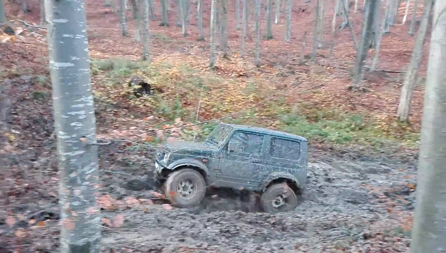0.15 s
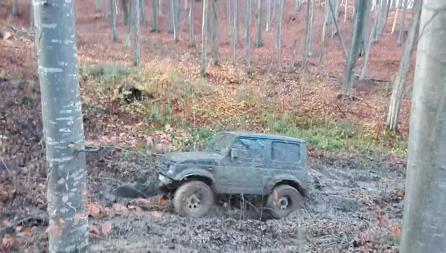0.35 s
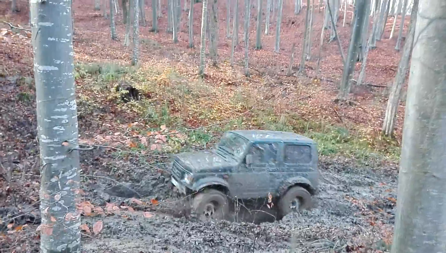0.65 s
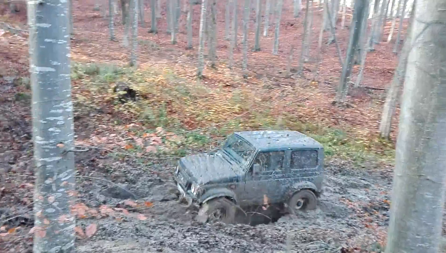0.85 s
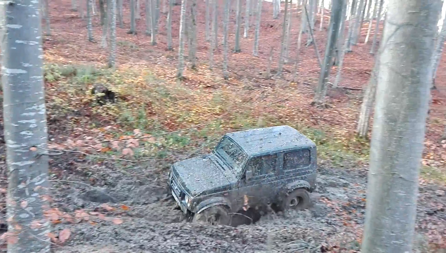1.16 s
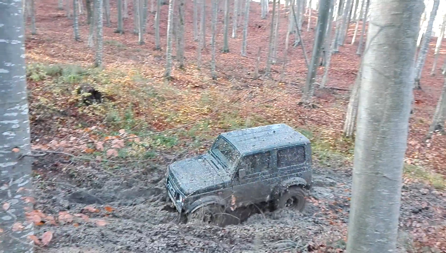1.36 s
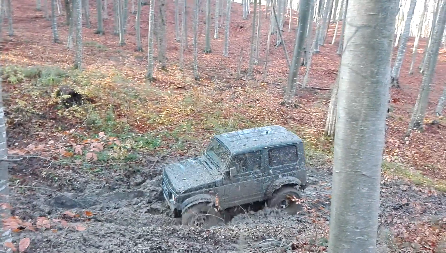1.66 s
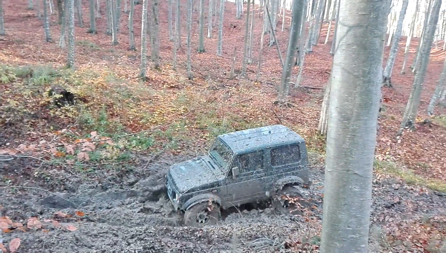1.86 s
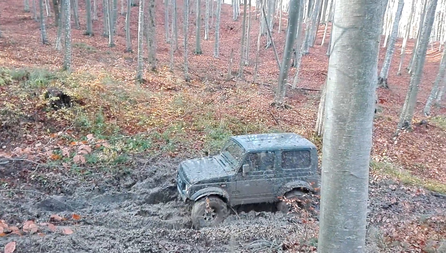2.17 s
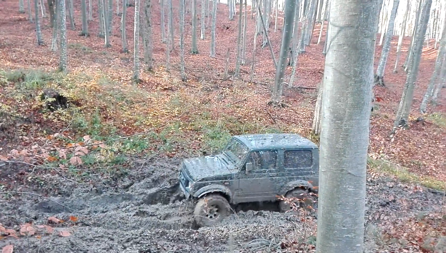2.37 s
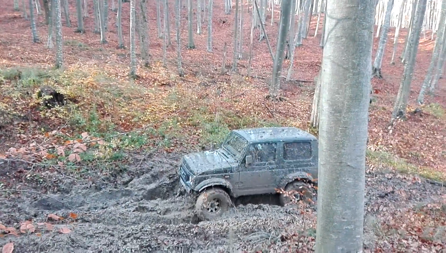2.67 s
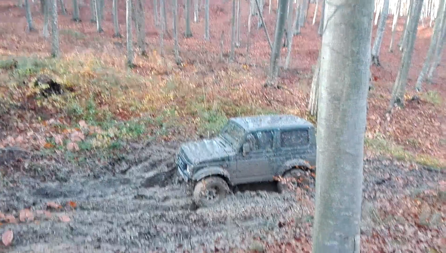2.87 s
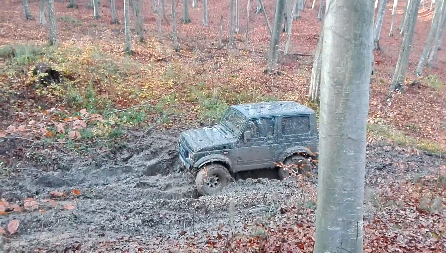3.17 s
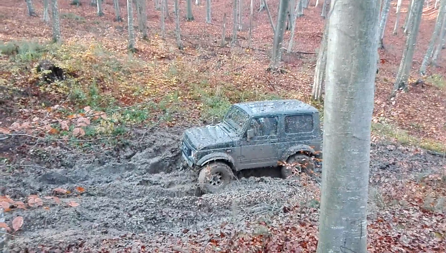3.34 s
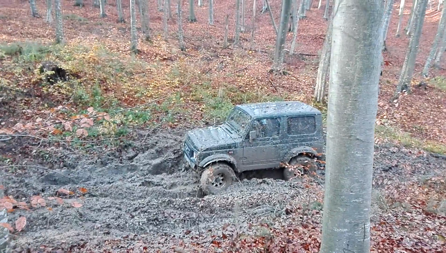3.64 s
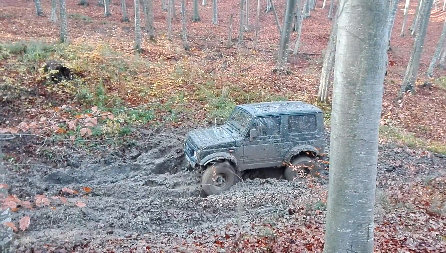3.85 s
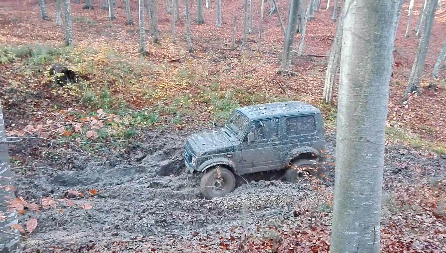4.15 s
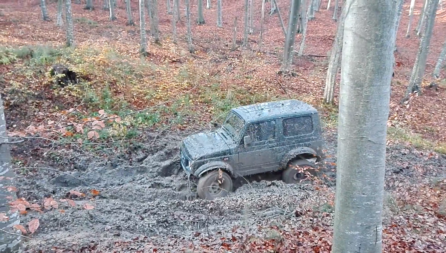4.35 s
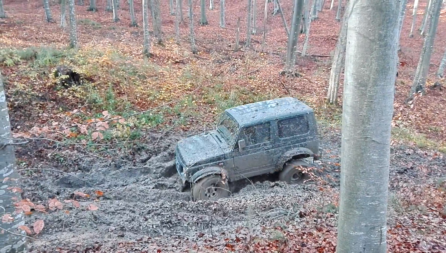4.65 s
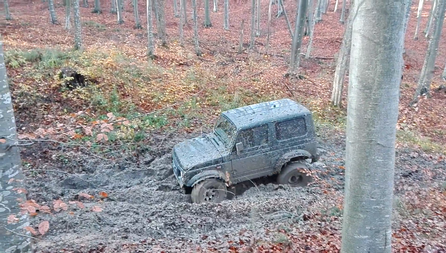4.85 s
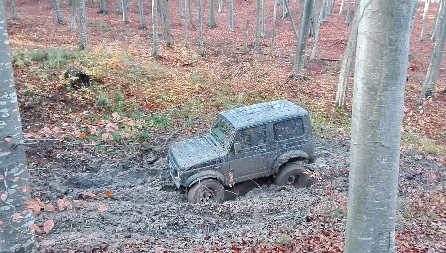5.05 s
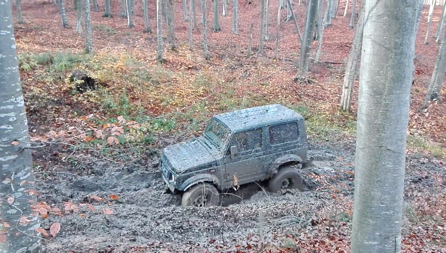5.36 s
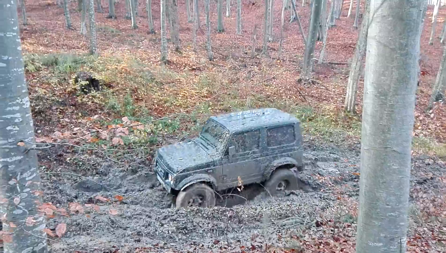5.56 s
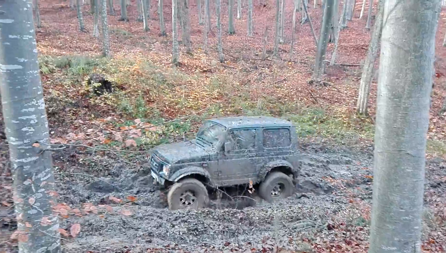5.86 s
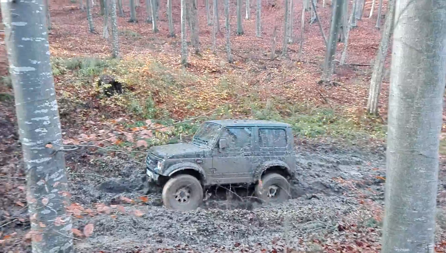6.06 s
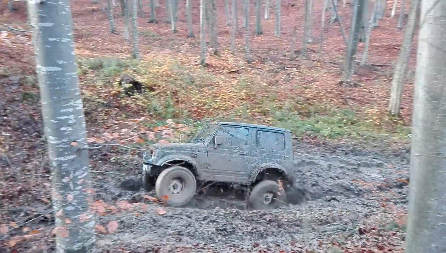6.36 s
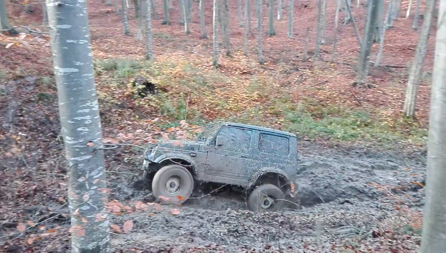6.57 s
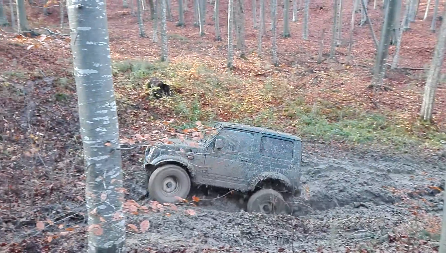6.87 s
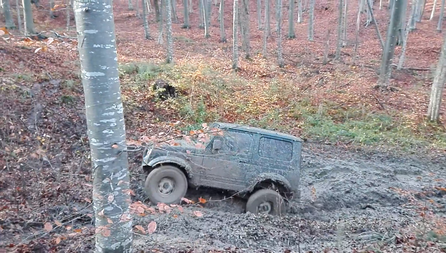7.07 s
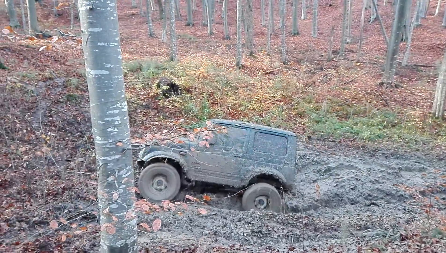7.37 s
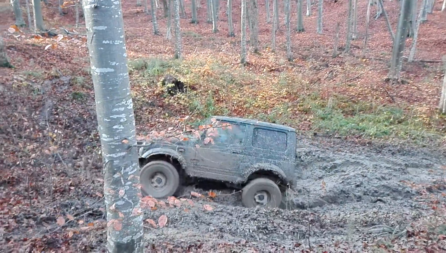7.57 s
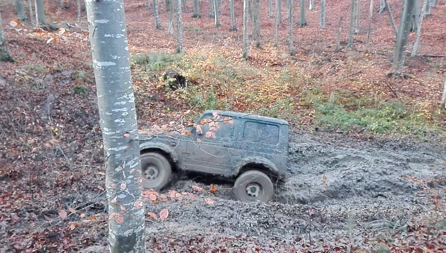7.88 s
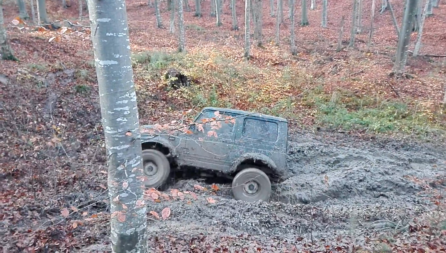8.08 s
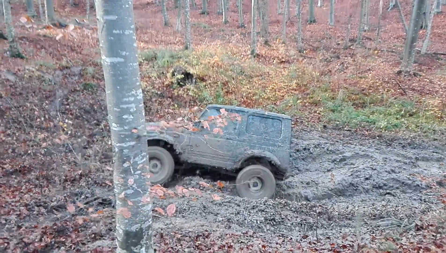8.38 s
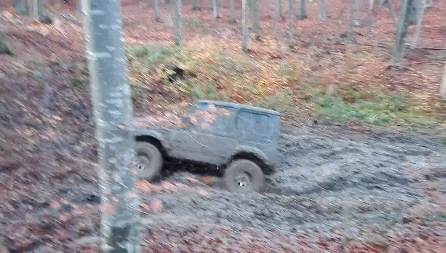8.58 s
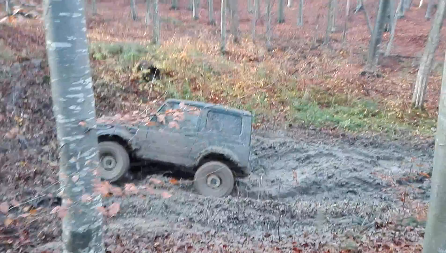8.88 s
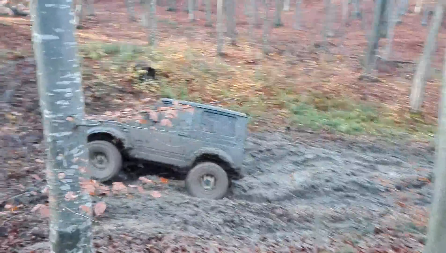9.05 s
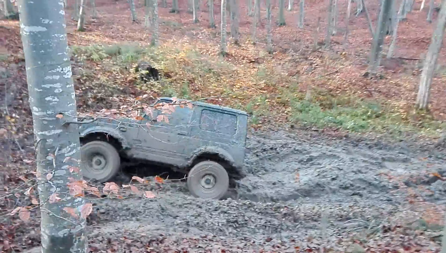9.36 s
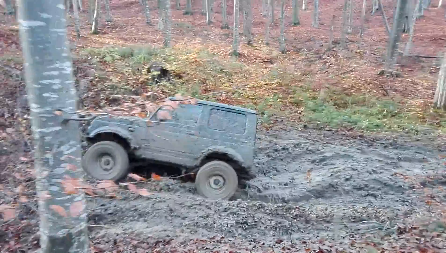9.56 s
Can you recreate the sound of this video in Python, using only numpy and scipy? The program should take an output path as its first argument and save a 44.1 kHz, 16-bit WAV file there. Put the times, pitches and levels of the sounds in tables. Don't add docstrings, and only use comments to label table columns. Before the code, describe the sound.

A small off-road engine drones hard in deep mud, bogs down and stumbles, then revs again and climbs while tyres fling wet mud.

```python
import sys
import numpy as np
from scipy import signal
from scipy.fft import rfft, irfft, next_fast_len
from scipy.io import wavfile
from scipy.ndimage import uniform_filter1d, map_coordinates

SR = 44100
rng = np.random.default_rng(int(sys.argv[2]) if len(sys.argv) > 2 else 0)


def waveform_to_disk(signal):
    frames = np.transpose(np.atleast_2d(signal))
    scaled = np.clip(frames, -1, 1) * 32767
    samples = np.round(scaled).astype(np.int16)
    wavfile.write(sys.argv[1], SR, samples)


def attenuation_scalar(level_db):
    decades = np.asarray(level_db, float) / 20
    return 10 ** decades


N = 428652

# [time_s, firing_rate_hz]
ENGINE_SPEED = [(0.027, 115.0), (0.224, 128.8), (0.628, 137.5), (0.994, 134.1), (1.844, 147.3),
                (2.319, 123.2), (2.98, 91.8), (3.209, 140.2), (4.395, 135.2), (4.642, 137.7), (5.62, 161),
                (5.71, 164.7), (6.117, 168.3), (7.221, 169.9), (7.634, 179.3), (7.962, 175.5),
                (9.208, 172.6), (9.673, 181.4)]
# [peak_s, extra_hz, rise_s, fall_s]
REV_FLARES = [(0.82, 8.0, .155, .194), (1.594, 32.2, .173, .154), (2.955, 6.8, .03, .05),
              (3.139, 4, .128, .018), (3.434, -5.6, .069, .056), (3.741, 45.1, .183, .145),
              (4.076, 6.3, .055, .065), (5.464, 3.1, .075, .097), (6.433, 4.3, .089, .077),
              (6.76, -1.8, .07, .07), (8.345, 9.6, .23, .332)]
# [start_s, lag_firings]
MISFIRES = [
    (1.884, .2),
    (3.252, .55),
    (3.397, .14),
]
# [time_s, level_db]
THROTTLE = [(0, -42.5), (.46, -41), (1.8, -43.5), (1.89, -51), (2.6, -55.5), (2.95, -60.5), (2.985, -45),
            (3.03, -50), (3.14, -39), (3.25, -50), (3.44, -49.5), (3.63, -37), (4.2, -40.5), (4.5, -41.5),
            (5.65, -40), (6.7, -40), (7.82, -42.5), (9.72, -41)]
# [time_s, level_db]
WHEELSPIN = [(0.0, -47.5), (0.54, -43.5), (0.59, -42), (2.9, -58), (3.06, -53), (3.52, -52.5), (3.6, -49.5),
             (4.06, -45), (4.87, -47.5), (5.3, -45.5), (6.2, -46), (6.66, -41), (7.09, -50.5),
             (8.31, -47.5), (8.47, -45), (9.09, -47.5), (9.69, -47.5), (9.72, -44)]
FULL_THROTTLE_DB, FULL_SPIN_DB = -40, -45

# [time_s, level_db]
DRONE = [(0, -21.5), (.187, -18.9), (.41, -10), (1.263, -12.8), (1.378, -15), (2.692, -16.6),
         (2.921, -13.5), (4.211, -16), (4.456, -22.2), (4.945, -15.6), (5.036, -12.5), (5.38, -10),
         (6.01, -15.5), (6.27, -11.6), (6.9, -10.5), (6.96, -13.5), (8.313, -19.4), (9.72, -20.1)]
# [peak_s, change_db, rise_s, fall_s]
STUMBLES = [(.159, -10.5, .08, 0.054), (1.434, 3, 0.042, 0.037), (1.846, -5, .044, 0.17),
            (1.891, 3.5, .004, 0.042), (2.403, -5, .06, 0.097), (2.936, -7.5, 0.039, 0.054),
            (3.064, -1.8, .01, .021), (3.145, -4.5, 0.069, .01), (3.238, -8.4, .035, 0.031),
            (3.411, -8, 0.0065, .155), (3.471, 2.5, 0.025, .022), (3.619, -2.5, .025, .047),
            (3.717, -4, .01, .067), (3.933, -4, .078, .051), (4.117, -3.1, .053, .034),
            (4.264, -2.9, .057, .055), (5.6, 1.5, .15, 0.087), (6.45, -0.5, .1, .15),
            (7.262, -1, .127, .068), (9.17, -2.4, 0.31, 0.17)]
# [pitch_hz, level_db]
TAILPIPE = [(200, -21.5), (280, -29.5), (340, -34), (410, -37.5), (500, -43.5), (550, -54), (700, -55.5),
            (900, -57.5)]
OVERTONE_TRIM = [0, -0.5, 2, 4]
OVERTONE_LOAD = [1.2, 0.68, 0.93, 0.82]
# [peak_s, harmonic, change_db, half_length_s]
OVERTONE_FADES = [(.31, 2, -9.5, 0.41), (0.444, 2, -16, .06), (1.29, 2, -13, 0.14), (1.725, 2, -10.5, 0.07),
                  (2.567, 2, -17, 0.1), (2.937, 2, 15.5, 0.038), (3.13, 2, -10, 0.12), (3.745, 2, 19.5, 0.064),
                  (3.824, 2, -21.5, 0.39), (4.89, 2, -9, .59), (5.24, 2, -13.5, 0.096), (6.7, 2, -9, .06),
                  (6.96, 2, -6, 0.17), (7.86, 2, -7.5, 0.62), (0, 3, -11, 0.11), (0.177, 3, -1, 0.034),
                  (.47, 3, -19, 0.12), (.97, 3, -9, 0.27), (2.19, 3, -10.5, 0.74), (3.23, 3, -8.5, 0.46),
                  (3.986, 3, -15, 0.1), (2.9, 5, -8, 0.17), (6.42, 3, -17, 0.099), (6.64, 3, -18.6, 0.07),
                  (9.5, 3, -8, 0.18), (.11, 4, -19, 0.34), (2.953, 4, -9, .12), (8.6, 4, -9, .7),
                  (3.747, 5, 12, .07), (8.9, 5, 0, 0.23)]
# [pitch_hz, level_db]
SILENCER = [(60, -52), (78, -50), (88, -44.5), (105, -48.5), (135, -50), (170, -44.5), (205, -60),
            (260, -73)]

CYLINDERS = [0, -1.5, .8, -.6]
# [pitch_hz, density_db_per_hz]
ROAR = [(110, -25), (190, -3.5), (205, -17.5), (246, -24), (317, -21.5), (411, -23), (1420, -18),
        (1630, -22), (1900, -26), (2470, -36), (4180, -120)]
# [pitch_hz, width_hz, level_db]
BLOCK = [(1202, 396, 2), (1635, 120, 7), (1957, 353, 0), (2375, 830, -1), (2926, 1040, -1),
         (3340, 350, -26.5), (4215, 200, -6.5), (5004, 1350, -6.5), (6720, 810, -18)]
# [peak_s, lift_db, rise_s, fall_s]
PANEL_SINGS = [
    (.8, -2, 0.64, .15),
    (3.12, 9, .06, .1),
    (3.7, 16, 0.17, 0.46),
    (5.8, 13, 0.53, .05),
    (6.7, 14, .1, 0.23),
    (7.25, 12, 0.33, 0.14),
    (7.8, 9, .15, 0.071),
    (8.38, 18, 0.36, 0.36),
    (9.6, 6, 0.16, .1),
]
# [pitch_hz, density_db_per_hz]
SPRAY = [(2350, -36), (4000, -3.5), (4280, -5), (4880, -2.5), (5600, -3.5), (8700, -24.5), (10200, -16),
         (12300, -15.5), (14000, -24.5)]
# [start_s, peak_db, pitch_hz]
CLODS = [(2.265, -40, 2500), (2.2665, -36.5, 3840), (2.37, -55, 9000), (2.4624, -45, 7250),
         (2.912, -55, 10900), (2.944, -42.5, 5600), (3.251, -43.5, 5100), (4.381, -34, 4500),
         (8.421, -36.5, 5600), (8.535, -44, 9000), (8.579, -46, 9950), (8.848, -33, 5740)]
# [start_s, peak_db, pitch_hz]
THUMPS = [
    (2.96, -33, 60),
    (3.259, -26, 87),
    (8.27, -25, 80),
]
# [peak_s, change_db, rise_s, fall_s]
LURCHES = [
    (1.2, -3, .5, 0.44),
    (2.4, 2, .25, .25),
    (2.97, 10, .05, .08),
    (4.25, 6.5, .12, .4),
    (6.55, 7, 0.18, 0.23),
    (7.4, -4, 0.35, 0.9),
    (8.4, 6, .1, .2),
    (9.6, 5, .3, .2),
]


def level(x, db):
    return x * attenuation_scalar(db) / np.sqrt(np.mean(x ** 2))


def columns(rows):
    s, *cols = np.transpose(rows)
    return [np.interp(np.arange(N) / SR, s, c) for c in cols]


def bumps(rows):
    t = np.linspace(0, N / SR, num=N // 32)
    total = 0 * t
    for s, size, rise, fall in rows:
        total = total + size * np.exp(-((t - s) / np.where(t < s, rise, fall)) ** 2)
    return np.interp(np.arange(N) / SR, t, total)


def walk(rate):
    hold = int(SR / rate)
    steps = np.repeat(rng.standard_normal(N // hold + 1), hold)
    return 1.093 * uniform_filter1d(uniform_filter1d(steps, hold), hold)[:N]


def wander(db, rate):
    count = int(N / SR * rate) + 2
    gains = attenuation_scalar(1.25 * db * rng.standard_normal(count))
    return np.interp(np.arange(N) / SR * rate, np.arange(count), gains)


def resonate_twice(x, hz, width):
    b, a = signal.iirpeak(hz, hz / width, fs=SR)
    return signal.lfilter(b, a, signal.lfilter(b, a, x))


def band(x, lo_hz, hi_hz):
    return signal.sosfilt(signal.butter(3, [lo_hz, hi_hz], "bandpass", fs=SR, output="sos"), x)


def colour(x, shape):
    hz, db = np.transpose(shape)
    size = next_fast_len(N)
    f = np.maximum(np.arange(size // 2 + 1) * SR / size, 1)
    gain = attenuation_scalar(np.interp(np.log(f), np.log(hz), db, left=-80, right=-80))
    return irfft(rfft(x, size) * gain, size)[:N]


def flicker(shape, db, own_db, rate):
    x = colour(rng.standard_normal(N), shape)
    lowest, highest = shape[0][0], shape[-1][0]
    edges = lowest * 2 ** np.arange(0, np.log2(highest / lowest) + .5, .5)
    return level(sum(band(x, a, b) * wander(own_db, rate) for a, b in zip(edges, edges[1:])), db)


def passed(hz, shape):
    pipe_hz, pipe_db = np.transpose(shape)
    return np.interp(np.log(hz), np.log(pipe_hz), pipe_db)


def line(level_db, cycles):
    return np.sqrt(2) * attenuation_scalar(level_db) * np.sin(2 * np.pi * cycles)


def firing_rate():
    smooth = uniform_filter1d(uniform_filter1d(columns(ENGINE_SPEED)[0], size=2000), size=2000)
    return smooth + bumps(REV_FLARES)


def crank(hz):
    turns = np.cumsum(hz * (1 + 0.00199 * walk(25))) / SR
    for s, lag in MISFIRES:
        slip_s = .006 + .02 * abs(lag)
        turns = turns - lag * np.clip((np.arange(N) / SR - s) / slip_s, 0, 1)
    return turns


def exhaust(turns, dbs):
    out = 0
    for k, db in enumerate(dbs):
        flutter = wander(.3 + .8 * k, 45)
        slip = .15 * k * walk(30)
        out = out + flutter * line(db, (k + 1) * turns + (0.71 * k + slip) / (2 * np.pi))
    return out


def overtones(hz, load_db):
    smear_db = 0.13 * abs(np.gradient(hz)) * SR
    drifts_db = (0.23, 1.1, 4.0, 3.1)
    levels = []
    for k, trim_db, share, drift_db in zip(range(2, 6), OVERTONE_TRIM, OVERTONE_LOAD, drifts_db):
        fades = [(s, size, half, half) for s, order, size, half in OVERTONE_FADES if round(order) == k]
        db = passed(k * hz, TAILPIPE) + trim_db + share * load_db + drift_db * walk(3.98) + bumps(fades)
        if k > 3:
            db = db - smear_db
        levels.append(db)
    return levels


def lope(turns, hz):
    out = 0
    for order in np.array([2, 3, 5, 6]) / 4:
        db = passed(order * hz, SILENCER) + 2.8 * walk(7.5)
        out = out + line(db, order * turns + .5 * walk(6.9) / (2 * np.pi))
    return out


def growl(turns, load_db):
    out = 0
    for k, order in enumerate(np.array([11, 13, 14, 15, 17]) / 4):
        db = -56 - 0.36 * k + load_db + 4.8 * walk(2.53)
        out = out + line(db, order * turns + 0.71 * walk(12) / (2 * np.pi))
    return out


def boom(drone_db):
    return attenuation_scalar(0.31 * drone_db - 50.5) * level(band(rng.standard_normal(N), 170, 390), 0)


def firings(turns, scatter_db):
    at = np.flatnonzero(np.diff(np.floor(turns)) > 0)
    out = np.zeros(N)
    late = turns[at + 1] % 1 / (turns[at + 1] - turns[at])
    scatter = scatter_db * rng.standard_normal(N // 100)[:len(at)]
    size = attenuation_scalar(np.resize(CYLINDERS, len(at)) + scatter)
    out[at] += size * late
    out[at + 1] += size * (1 - late)
    return out


def cycle_noise(turns, rate):
    steps, span = 600, 6000
    pattern = rng.standard_normal((200, steps))
    pattern = np.column_stack([pattern, pattern[:, 0]])
    hz = uniform_filter1d(uniform_filter1d(np.gradient(turns) * SR, span), span)
    age = np.cumsum(rate * (.35 / SR + abs(np.gradient(hz)) / 50))
    angle = turns / 4 % 1 * steps
    return level(map_coordinates(pattern, [age, angle], order=1, mode="mirror"), 0)


def intake(turns, db):
    puff = 1.87 + np.exp(-(turns % 1) / 0.36)
    pulses = level(band(firings(turns, scatter_db=4.5), 750, 1500), -12)
    rasp = level(colour(cycle_noise(turns, rate=3), ROAR), .5)
    air = puff * flicker(ROAR, -7.5, own_db=1.2, rate=12)
    return attenuation_scalar(db + 0.44) * (pulses + rasp + air)


def clatter(shake, db):
    taps = rng.standard_normal(N) * attenuation_scalar(1.5 * rng.exponential(size=N))
    taps = level(taps, -1) + shake * attenuation_scalar(-4)
    ring = sum(attenuation_scalar(g) * wander(0.6, 14) * resonate_twice(taps, f, 1.52 * w) for f, w, g in BLOCK)
    return attenuation_scalar(db) * level(ring, .1)


def panel(shake, load_db):
    db = -54 + .6 * load_db + bumps(PANEL_SINGS)
    upper = level(resonate_twice(shake, 1620, 130), -8.5)
    lower = level(resonate_twice(shake, 1254, 80), -46.5)
    return attenuation_scalar(db) * wander(2.6, 22) * upper + attenuation_scalar(0.22 * db) * wander(2.3, 2.8) * lower


def spray(db):
    drops = (rng.random(N) < 40 / SR) * attenuation_scalar(1.5 * rng.exponential(size=N))
    drops = signal.lfilter([1], [1, -.9], drops) * rng.standard_normal(N)
    hiss = attenuation_scalar(.5 * walk(30)) * flicker(SPRAY, 4.5, own_db=1.2, rate=24)
    return attenuation_scalar(db) * (hiss + level(band(drops, 9500, 14000), -19))


def clods():
    out, t = np.zeros(N + SR), np.arange(SR // 20) / SR
    grits = rng.standard_normal((len(CLODS), len(t)))
    for (s, db, hz), grit in zip(CLODS, grits):
        i = int(s * SR)
        out[i:i + len(t)] += attenuation_scalar(db + 9.5) * band(grit * np.exp(-t / 0.0042), hz / 1.84, hz * 1.18)
    return out[:N]


def thumps():
    out, t = np.zeros(N + SR), np.arange(SR // 5) / SR
    envelope = np.exp(-t / 0.021) * (1 - np.exp(-t / 0.0015))
    for s, db, hz in THUMPS:
        i = int(s * SR)
        out[i:i + len(t)] += attenuation_scalar(db) * np.sin(2 * np.pi * hz * t) * envelope
    return out[:N]


def rumble(db):
    return attenuation_scalar(db + 0.73 * walk(5.1)) * level(band(rng.standard_normal(N), 30, 130), 0.94)


def scene():
    hz = firing_rate()
    turns = crank(hz)
    load_db = columns(THROTTLE)[0] - FULL_THROTTLE_DB
    spin_db = columns(WHEELSPIN)[0] - FULL_SPIN_DB
    drone_db = columns(DRONE)[0] + bumps(STUMBLES)
    shake = cycle_noise(turns, rate=11)

    mono = exhaust(turns, [drone_db] + overtones(hz, load_db))
    mono = mono + lope(turns, hz) + growl(turns, load_db) + boom(drone_db)
    mono = mono + intake(turns, -40 + load_db)
    mono = mono + clatter(shake, -37 + 0.36 * load_db + 0.7 * spin_db)
    mono = mono + panel(shake, load_db)
    mono = mono + spray(-49 + 1.03 * spin_db)
    mono = mono + clods() + thumps()
    mono = mono + rumble(-48 + bumps(LURCHES))
    return np.array([mono, mono])


def band_limit(x):
    return signal.sosfilt(signal.butter(12, 14180, fs=SR, output="sos"), x)


def record(dry):
    f, _, mid = signal.stft(dry[0], SR, nperseg=2048)
    side = signal.stft(rng.standard_normal(N), SR, nperseg=2048)[2]
    frames = mid.shape[1]
    jumps = uniform_filter1d(rng.standard_normal(frames), size=2) * np.sqrt(2)
    edge_hz = 6000 * np.exp(.22 * jumps)
    bands = 4100 * 1.09 ** np.arange(16)
    gain, step = np.zeros(mid.shape), np.ones(mid.shape)
    draws = rng.standard_normal((len(bands), 2, frames // 2 + 1)).repeat(2, axis=2)
    for a, b, draw in zip(bands, bands[1:], draws):
        rows = (f >= a) & (f < b)
        mid_power = np.mean(abs(mid[rows]) ** 2, axis=0)
        side_power = np.mean(abs(side[rows]) ** 2, axis=0)
        hole, rough = draw[:, :frames]
        step[rows] = attenuation_scalar(1.4 * rough)
        gain[rows] = np.sqrt(mid_power / side_power) * step[rows] * (a > edge_hz) * (hole > -1.1)
    side = attenuation_scalar(-4) * signal.istft(side * gain, SR, nperseg=2048)[1][:N]
    mono = signal.istft(mid * step, SR, nperseg=2048)[1][:N]
    return band_limit(mono + np.array([side, -side]))


dry = scene()
out = record(dry)
waveform_to_disk(out)
```